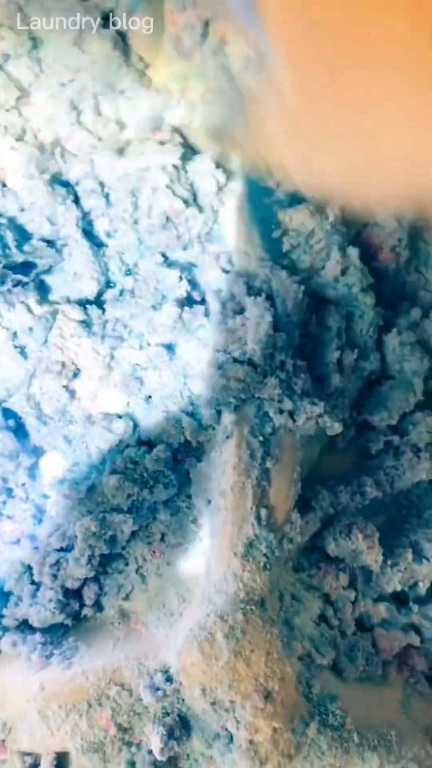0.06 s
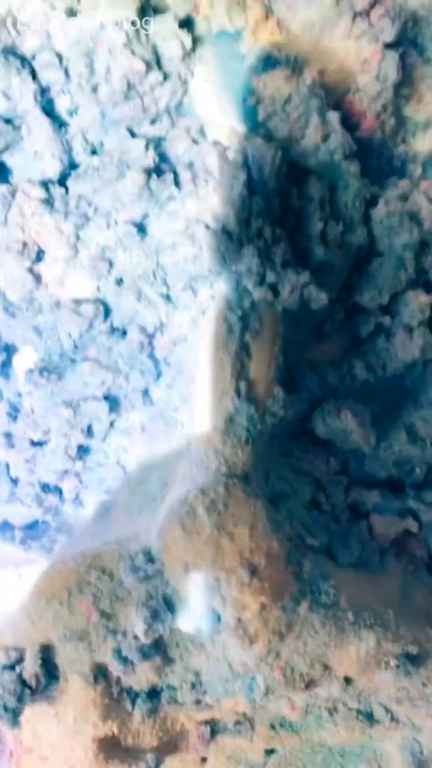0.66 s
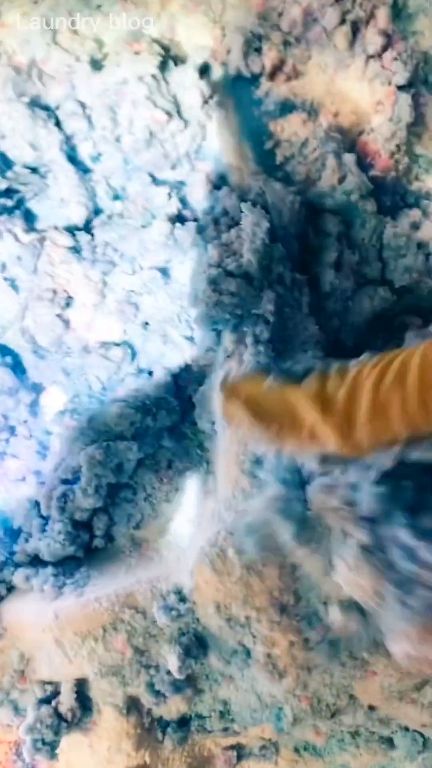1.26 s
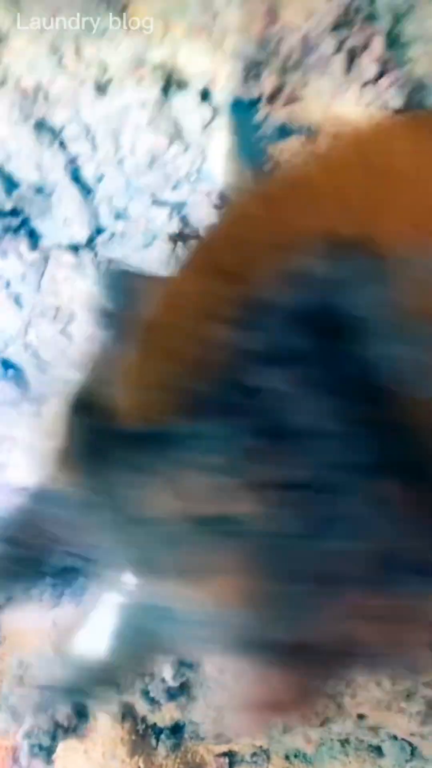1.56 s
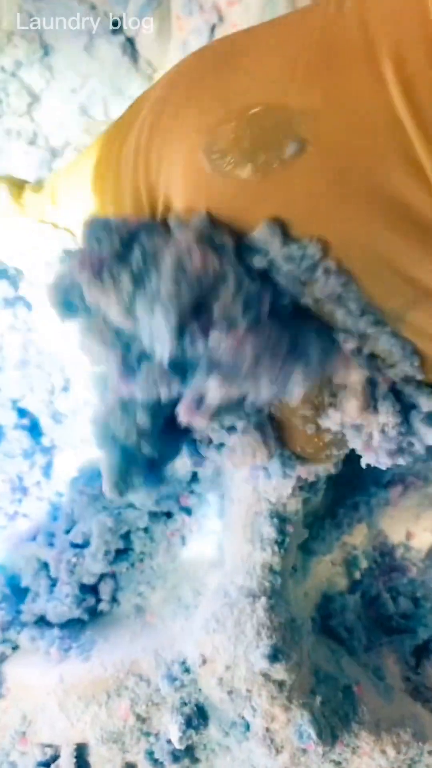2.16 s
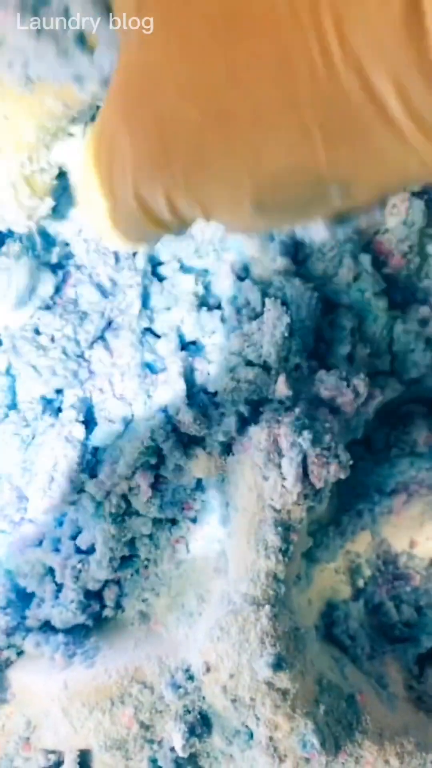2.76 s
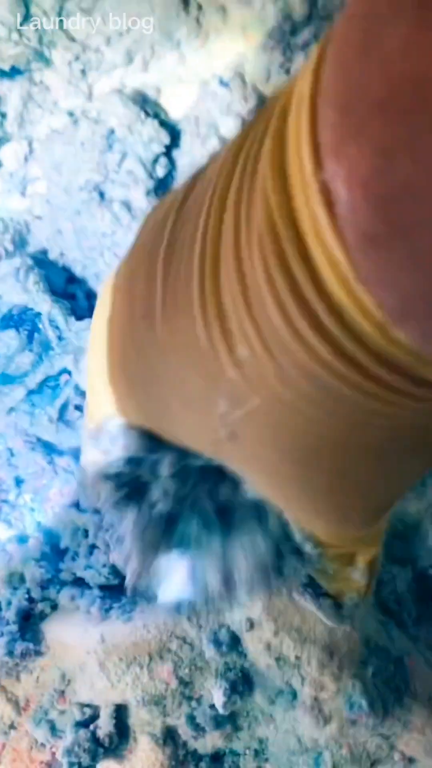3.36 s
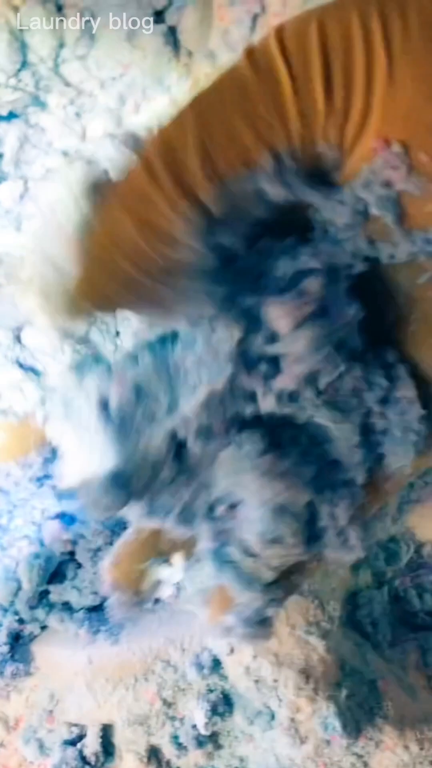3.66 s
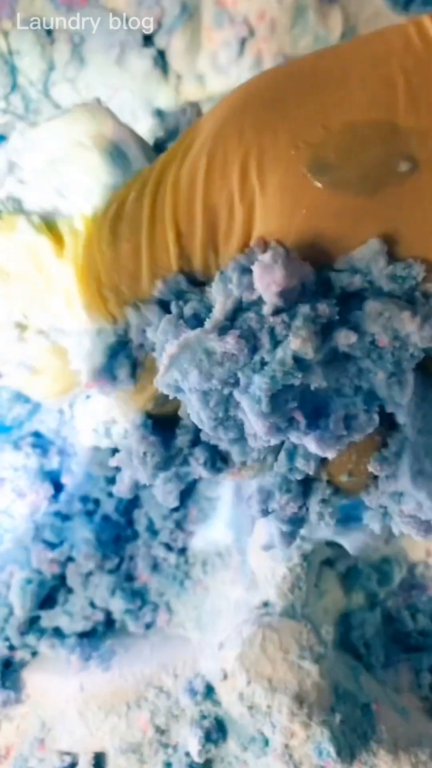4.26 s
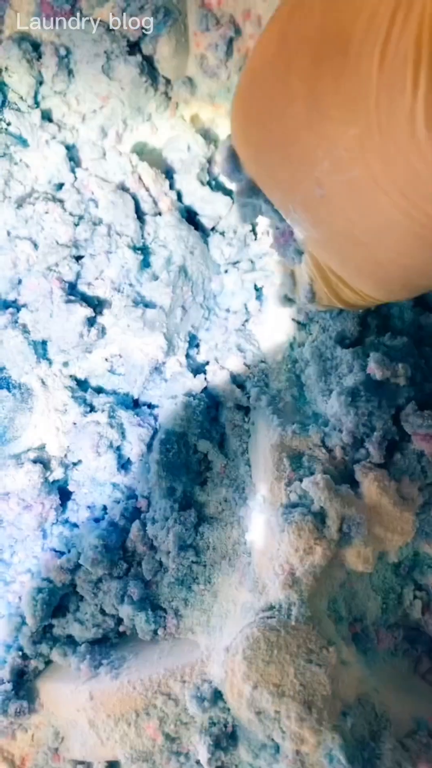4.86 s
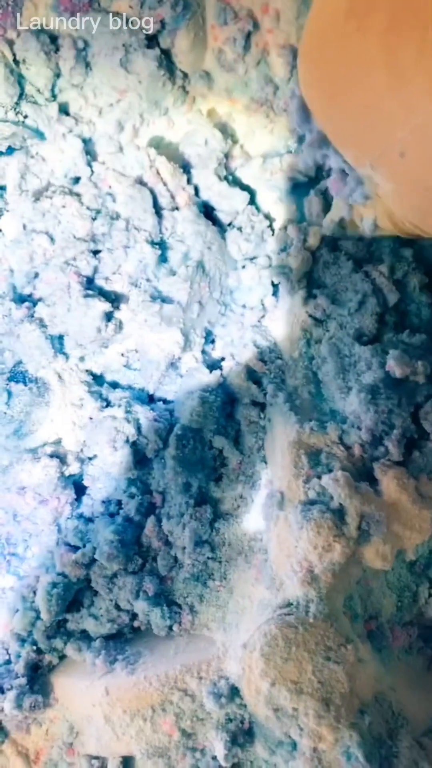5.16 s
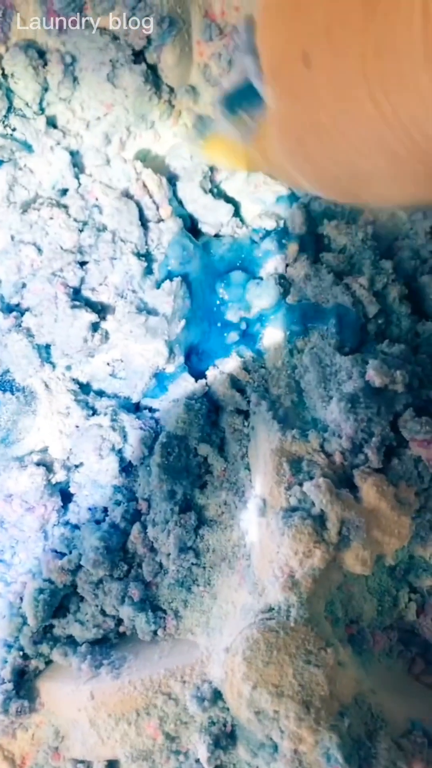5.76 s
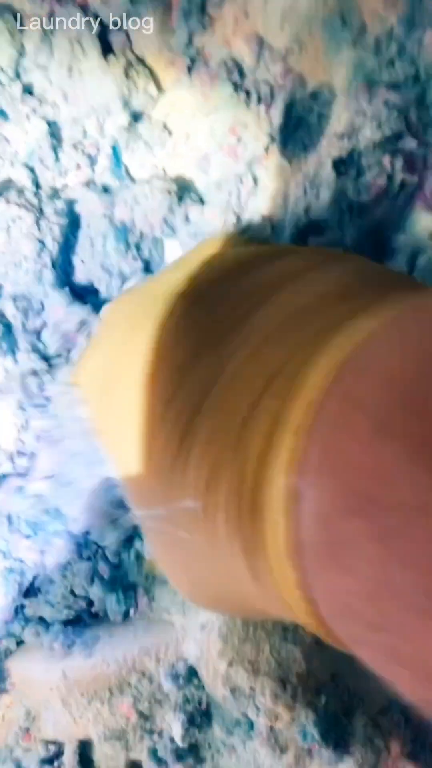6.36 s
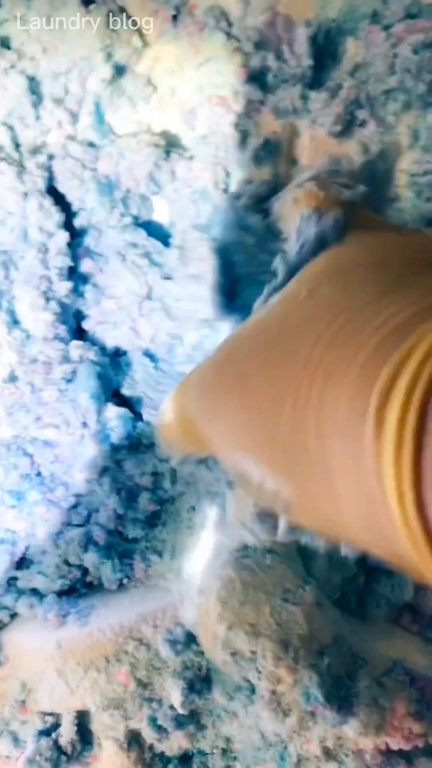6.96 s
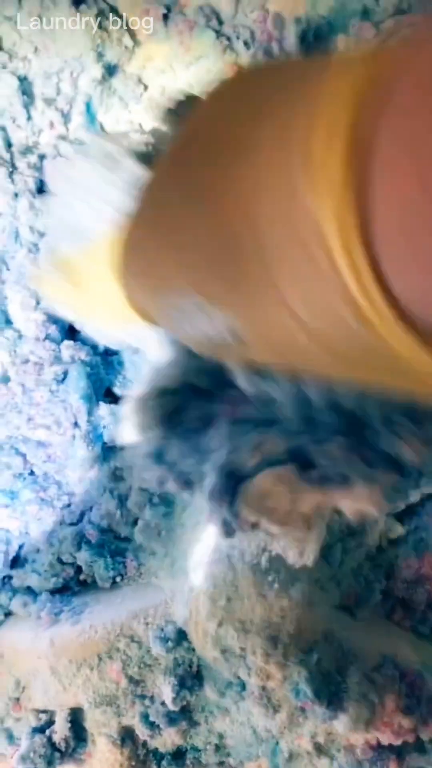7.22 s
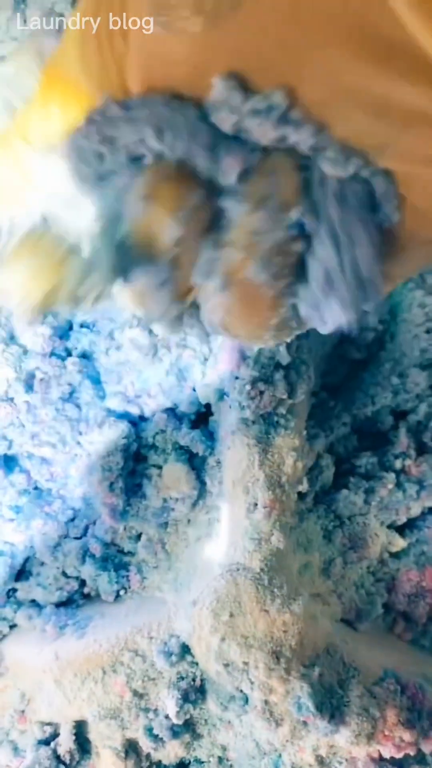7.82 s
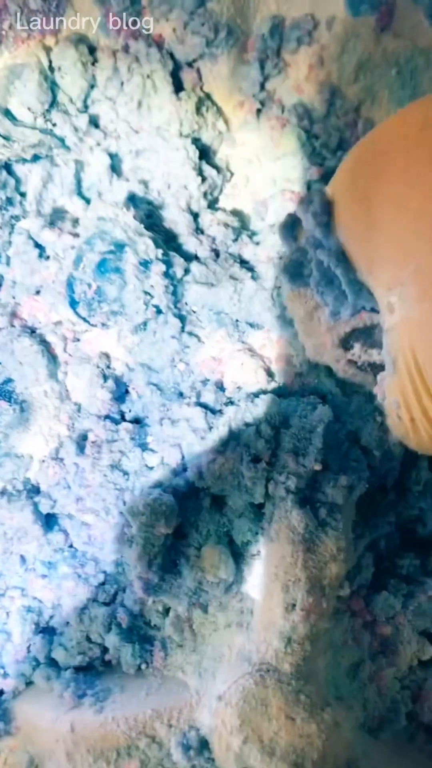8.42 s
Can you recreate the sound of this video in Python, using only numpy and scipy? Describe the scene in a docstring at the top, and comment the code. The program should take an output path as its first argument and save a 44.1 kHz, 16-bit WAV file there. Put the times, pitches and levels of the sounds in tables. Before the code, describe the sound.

A rubber-gloved hand digs into damp, clumpy powder and squeezes handfuls, making soft, gritty crunches with small snaps, dull thuds and faint rubbery creaks. Past midway a dollop of liquid lands with a loud plop and fizzes briefly. The crunching returns a little stronger, drops out for a moment, and a loud gush starts at the very end. It is all close to the microphone in a small, dry room.

```python
"""A close, damp crunch with snaps and soft thuds: a rubber-gloved hand digs, squeezes and crumbles powder.
Avalanches of tiny fractures make the crunch, clumps crack, lumps land, and the glove sticks and slips.
The tray beneath resonates faintly in a small, dry room. Past midway a dollop of liquid slaps down,
rings pockets of air and fizzes into the powder. The sound fades out briefly twice,
and a loud gush starts at the very end."""
import sys
import numpy as np
from scipy import signal
from scipy.fft import rfft, irfft, next_fast_len
from scipy.io import wavfile

SR = 44100
rng = np.random.default_rng(int(sys.argv[2]) if len(sys.argv) > 2 else 0)


def pcm_store(signal):
    """Save signal as 16-bit PCM."""
    levels = np.round(np.clip(np.atleast_2d(signal), -1, 1) * 32767)
    wavfile.write(sys.argv[1], SR, levels.astype(np.int16).T)


N = 378819
TIME = np.arange(N) / SR
FFT_SIZE = next_fast_len(N + SR // 2)
FREQ = np.maximum(np.arange(FFT_SIZE // 2 + 1) * SR / FFT_SIZE, 1)


def crunch(grit_gain, crumbs_gain, dust_gain):
    """Acoustic emission: fractures come in avalanches; crumbs sound low, grit in the middle, dust high."""
    # spectrum of the fracturing powder: frequency_hz, gain_db
    spectrum = [(400, -15), (600, -14), (900, -4), (1500, -0.5), (2400, 1.5), (3300, 2), (4600, -2.5),
                (7000, -11.5), (8300, -13), (10000, -23.5), (12500, -19), (15500, -19)]
    grip_db = 1.22 * walk(rate_hz=20)
    avalanche = undb(grip_db + walk(rate_hz=41) + 1.12 * walk(rate_hz=260))
    fine_grains = clicks(per_second=9000, spread_db=2.5) * avalanche
    large_granules = undb(-12) * clicks(per_second=70, spread_db=0.1)
    grains = tray(through(fine_grains + large_granules, colour(spectrum)))
    grains = room(grains, wet_db=-1.5, t60_s=0.21)
    crumbs = unit(band(grains, 450, 1885, order=5)) * crumbs_gain
    grit = unit(band(grains, 1885, 6590, order=5)) * grit_gain
    dust = unit(band(grains, 6140, 16600, order=5)) * dust_gain
    return crumbs + grit + dust


def handwork():
    """Incoherent sources add in power: the hand's strokes sum to five gains, from grit to rumble."""
    # fingers ploughing the bed, coarse and heavy:
    # start_s, hold_s, grit_db, attack_s, release_s, crumbs_re_grit_db, churn_re_grit_db
    digs = [(0.0, 0.042, -51, 0.026, 0.31, -2, -12.5), (0.253, 0.083, -49, 0.015, 0.05, 1, -3.5),
            (0.426, 0.097, -49.5, .04, 0.095, 2.5, -1.5), (0.658, 0.043, -49, 0.044, 0.055, -1, 0.5),
            (0.747, .13, -44.5, 0.025, 0.064, -2.5, -5), (0.941, 0.059, -45, 0.024, 0.13, -1, -11.5),
            (1.083, 0.16, -53, .05, .06, -4, -9.5), (1.32, 0.019, -45.5, 0.058, 0.046, -2.5, -16),
            (1.521, 0.011, -65, 0.016, .02, 2, 10.5), (3.103, .015, -47.5, 0.06, 0.035, -2, -12),
            (3.192, 0.3, -46, 0.048, 0.022, -4, -15.5), (6.095, 0.057, -52.5, 0.066, .05, -1, -5.5),
            (6.226, 0.13, -46, 0.05, 0.034, -5, -15), (6.407, 0.039, -41, 0.037, 0.12, -6.5, -16.5),
            (6.664, 0.038, -48.5, 0.019, 0.066, -1, -16.5), (6.794, 0.23, -45, 0.029, 0.041, -1.5, -11),
            (7.062, .14, -43, 0.028, 0.043, -5, -16.5), (8.067, 0.01, -44.5, 0.0042, 0.019, 3.5, -9.5)]
    # a handful kneaded above the bed, fine and light:
    # start_s, hold_s, grit_db, attack_s, release_s, crumbs_re_grit_db, dust_re_grit_db
    squeezes = [(1.423, 0.038, -61, 0.038, 0.041, -1, 0), (1.546, 0.018, -54, 0.017, 0.065, -8.5, -4.5),
                (1.698, 0.085, -62.5, 0.03, 0.15, 1.5, 2.5), (1.825, .53, -56, .04, 0.087, -8, -7),
                (2.058, .06, -54.5, 0.19, 0.19, -12, 2), (2.436, 0.1, -59.5, .03, 0.015, -11, -3.5),
                (2.628, .02, -44, 0.048, 0.11, -9.5, -4.5), (2.834, 0.061, -61.5, 0.11, 0.15, -2.5, 2.5),
                (2.967, .015, -50.5, 0.021, 0.12, -5, -4), (3.25, 0.24, -59, .1, .05, -6, 1.5),
                (3.555, 0.21, -54, .03, 0.048, -6.5, 2), (3.844, .47, -55, 0.046, 0.2, -8.5, -0.5),
                (4.506, 0.034, -51, 0.034, 0.098, -8, -2.5), (4.744, 0.057, -61.5, 0.044, 0.03, -3.5, 2.5),
                (4.987, 0.024, -69, .03, 0.081, 2, 3), (5.192, 0.22, -64.5, 0.1, .06, -16, 3),
                (5.79, .02, -64.5, 0.087, 0.044, -8, -3), (5.939, 0.024, -46.5, 0.039, 0.029, -11.5, -1),
                (6.02, 0.11, -64, 0.04, 0.094, 7, 5.5), (6.67, .035, -50.5, 0.02, 0.051, -3, 3),
                (7.347, 0.018, -51, 0.074, 0.043, -5, 3), (7.395, 0.052, -46.5, 0.029, 0.079, -3.5, -1.5),
                (7.598, 0.034, -46.5, 0.027, 0.018, -4.5, -3.5),
                (7.656, .005, -45, 0.023, 0.035, -8.5, 0.5), (7.816, 0.11, -53, 0.12, 0.28, -7, 0),
                (8.07, 0.057, -40, 0.013, 0.034, -8.5, -5.5),
                (8.213, 0.022, -45.5, 0.028, 0.041, -5.5, -2.5), (8.486, 0.037, -67.5, .03, .02, 1, 2)]
    # loose powder sliding back onto the heap: start_s, hold_s, churn_db, attack_s, release_s
    slides = [(.19, 0.097, -53.5, 0.037, 0.046), (1.2, .06, -60, .05, 0.22), (1.69, 0.11, -65.5, 0.039, .1),
              (2.83, 0.3, -61, 0.045, .12), (3.55, 0.023, -62, 0.022, 0.14),
              (4.54, 0.095, -60.5, 0.046, 0.14), (5, 0.025, -60.5, 0.057, 0.034),
              (5.327, 0.022, -71.5, .03, 0.054), (6.184, .01, -43.5, 0.011, 0.022),
              (6.827, 0.057, -40, 0.025, 0.0075), (7.73, 0.069, -65.5, 0.025, 0.12)]
    dig_dust_db, dig_rumble_db = -6.5, -25.5  # relative to the grit
    squeeze_churn_db, squeeze_rumble_db = -20.5, -20  # relative to the grit
    settling_db = [-73.5, -71.5, -75.5, -73, -68.5]  # grit, crumbs, dust, churn, rumble at rest
    power = np.outer(undb(settling_db) ** 2, np.ones(N))
    for *shape, crumbs_db, churn_db in digs:
        balance = undb([0, crumbs_db, dig_dust_db, churn_db, dig_rumble_db])
        power += np.outer(balance ** 2, stroke(*shape))
    for *shape, crumbs_db, dust_db in squeezes:
        balance = undb([0, crumbs_db, dust_db, squeeze_churn_db, squeeze_rumble_db])
        power += np.outer(balance ** 2, stroke(*shape))
    grit, crumbs, dust, churn, rumble = power
    slide_churn = sum(stroke(*row) for row in slides)
    slide_rumble = slide_churn * undb(-11.5) ** 2
    return np.sqrt([grit, crumbs, dust, churn + slide_churn, rumble + slide_rumble])


def stroke(start_s, hold_s, level_db, attack_s, release_s):
    """Power envelope of one movement: a Gaussian rise, a hold, then exponential relaxation."""
    early = np.maximum(start_s - TIME, 0)
    late = np.maximum(TIME - start_s - hold_s, 0)
    falloff = np.minimum((early / attack_s) ** 2 + late / release_s, 20)
    return (undb(level_db) * np.exp(-falloff)) ** 2


def snaps():
    """Brittle fracture: a clump starts to give, breaks with one crack, then sheds a dying spray."""
    # breaking clumps: time_s, level_db, centre_hz, crumble_s, crumbs_re_crack_db
    clumps = [(0.246, -41.5, 2310, 0.0098, 11.5), (0.506, -43.5, 1490, 0.0099, 16.5),
              (0.653, -47.5, 2040, 0.013, 13), (.733, -35.5, 1490, 0.011, 6), (0.883, -42, 1530, 0.013, 13),
              (2.394, -32, 3680, 0.02, 4.5), (3.606, -41, 4200, 0.004, 4.5),
              (4.186, -45.5, 2500, 0.0075, -2), (4.453, -42.5, 1460, .003, -2),
              (4.497, -51, 1200, .005, -1), (4.510, -47.5, 1700, 0.01, 10.5),
              (4.670, -37, 2930, 0.0049, -1), (5.149, -57.5, 6000, 0.016, 12), (5.262, -48, 7000, 0.01, 11),
              (5.652, -60, 2020, .02, -6), (5.858, -53, 6000, 0.028, 10), (6.184, -36.5, 2760, 0.0074, 3),
              (6.650, -33, 1870, 0.0033, -2.5), (7.089, -37.5, 2230, 0.011, 10),
              (8.065, -38, 3060, 0.016, 7), (8.126, -35.5, 2900, 0.011, 6.5)]
    # spectrum of a crack: frequency_hz, gain_db
    spectrum = [(300, -14.5), (900, -5.5), (2500, -3), (7500, -3), (10000, -9.5), (15500, -4)]
    out, spray = np.zeros(N + SR), clicks(per_second=6000, spread_db=2)
    count, lead = SR // 4, SR // 50
    t = (np.arange(count) - lead) / SR
    for time_s, level_db, centre_hz, crumble_s, crumbs_db in clumps:
        start = int(time_s * SR) - lead
        span = slice(start, start + count)
        force = spray[span] * np.exp(np.minimum(t / 0.0046, -t / crumble_s))
        force *= undb(crumbs_db) / np.linalg.norm(force)
        force[lead] += 1  # the crack itself
        sound = band(force, centre_hz / 2, centre_hz * 1.6, order=1)
        # the level is the crack's energy spread over 4.4 ms; the crumbs add their own
        gain = undb(level_db) * np.sqrt(0.0044 * SR) * np.hypot(1, undb(crumbs_db))
        out[span] += gain * sound / np.linalg.norm(sound)
    return tray(through(out[:N], colour(spectrum)))


def dollop():
    """Impact and bubble resonance: liquid slaps, spatters, rings trapped air and fizzes as it soaks in."""
    # the liquid striking and slopping back: start_s, peak_db, pitch_hz, swell_s
    slops = [(5.4624, -12.5, 1164, 0.0012), (5.4645, -18, 345, 0.0014), (5.466, -27.5, 590, .0015),
             (5.4865, -22.5, 1185, 0.0013)]
    # spectrum of the spatter: frequency_hz, gain_db
    spectrum = [(20, -65), (60, -45), (150, -21), (320, -15), (650, -11), (900, -2.5), (1230, -4),
                (1900, 5.5), (3000, -9.5), (4500, -8.5), (5200, -15), (7300, -9), (9000, -17.5),
                (15500, -24.5)]
    # air pockets under the liquid: pitch_hz, relative_db, t60_s
    pockets = [(248, -2, .11), (1042, 0, .09), (1140, -5, .08), (1247, 3.5, .13), (1370, -2, .11),
               (1513, 1, .11), (1700, -4, .09), (1774, 0, .11), (1981, 0, .12), (2098, -4, .11)]
    # bubbling before the strike and during the soak: time_s, level_db, pitch_hz
    bubbling = [(5.41, -84, 1696), (5.435, -57, 1652), (5.452, -33.5, 1726), (5.465, -28.5, 1881),
                (5.5, -43.5, 1800), (5.525, -62, 2100), (5.635, -59.5, 2095), (5.66, -51, 1913),
                (5.75, -62.5, 1630), (5.87, -61.5, 1496)]
    age = np.maximum(TIME - slops[0][0], 0)
    splash = undb(-32 - 60 * age / 0.035)
    droplets = undb(-22.5 - 60 * age / 0.12)
    patter = unit(through(clicks(per_second=9000, spread_db=1), colour(spectrum)))
    spatter = patter * (splash + droplets) * (age > 0)
    ring = sum(undb(db - 60 * age / t60_s) * np.sin(2 * np.pi * hz * age) for hz, db, t60_s in pockets)
    fizz_db, pitch_hz = curves(bubbling)
    # bubbles of scattered sizes sound around one drifting pitch
    scatter = band(rng.standard_normal(N), 14, 440, order=2)
    bubbles = unit(scatter * np.cos(2 * np.pi * np.cumsum(pitch_hz) / SR))
    fizz = bubbles * undb(fizz_db) * (TIME > bubbling[0][0]) * (TIME < bubbling[-1][0])
    return blows(slops) + spatter + undb(-29) * ring + fizz


def gush():
    """Dense impulses excite broad resonances: a bright spray first, its hollow body just after."""
    # onset of the gush: time_s, spray_db, body_db
    onset = [(8.53, -70, -74), (8.548, -36.5, -46), (8.559, -26, -39), (8.565, -23.5, -23),
             (8.59, -20, -22.5)]
    # its resonances: centre_hz, width_hz, gain_db
    modes = [(78, 22, -3.5), (179, 180, -9), (312, 60, 2), (735, 45, -5), (1030, 120, 7), (1760, 540, -5),
             (2880, 250, -3.5), (3750, 270, 2.5), (4400, 220, 5), (6560, 600, -36), (12000, 7000, -42)]
    spray_db, body_db = curves(onset)
    rush = through(clicks(per_second=15000, spread_db=2), resonances(modes))
    spray = unit(band(rush, 2100, 16300, order=3)) * undb(spray_db)
    body = unit(band(rush, 30, 2500, order=3)) * undb(body_db)
    return (spray + body) * (TIME > onset[0][0])


def thuds():
    """Inelastic impact: lumps land and fingers bump the bed."""
    # blows on the powder: start_s, peak_db, pitch_hz, swell_s
    impacts = [(.227, -46.5, 93, 0.0029), (.482, -40, 88, 0.0041), (.496, -36, 723, 0.0062),
               (.729, -30, 251, 0.0023), (.735, -36, 1030, 0.0057), (.854, -40, 67, 0.012),
               (.886, -35, 416, 0.0075), (.888, -34, 762, 0.0062), (1.52, -48, 804, .008),
               (2.36, -54, 71, 0.0081), (2.564, -54, 99, .006), (2.835, -49, 76, 0.0079),
               (2.9, -50, 75, 0.011), (3.548, -47.5, 131, 0.0034), (4.172, -49, 61, 0.0055),
               (4.452, -45.5, 747, .004), (6.181, -31, 253, .0055), (6.631, -52, 77, .0055),
               (6.837, -29.5, 313, 0.0079), (6.847, -28, 400, 0.0051), (6.85, -46, 81, 0.016),
               (6.861, -25.5, 249, 0.0051)]
    return blows(impacts)


def blows(impacts):
    """Damped oscillation: each soft blow is a few uneven cycles that swell and die in the powder."""
    out, t = np.zeros(N + SR), TIME[:SR // 5]
    wobble = np.pad(walk(rate_hz=140), (0, SR))
    for start_s, peak_db, pitch_hz, swell_s in impacts:
        start, age = int(start_s * SR), t / swell_s
        span = slice(start, start + len(t))
        phase = 2 * np.pi * pitch_hz * np.cumsum(1 + 0.05 * wobble[span]) / SR
        envelope = (age * np.exp(1 - age)) ** 0.7
        out[span] += undb(peak_db) * envelope * np.sin(phase)
    return out[:N]


def rubs():
    """Stick-slip friction: rubber drags on the grains, each stretch of glove ringing at its own pitch."""
    # creaks of the glove: peak_s, swell_s, level_db, pitch_hz, width_hz
    creaks = [(.985, .08, -47, 2500, 900), (2.394, 0.0028, -29, 3790, 1090),
              (2.406, 0.0075, -39, 3700, 1075), (2.86, .02, -53.5, 6500, 1800),
              (3.27, 0.097, -47.5, 1560, 700), (3.41, 0.045, -43.5, 2000, 1300),
              (4.17, 0.21, -58, 1930, 220), (4.44, .012, -47.5, 1650, 450), (4.456, .0027, -34, 1710, 497),
              (4.454, 0.0071, -41, 2840, 500), (4.512, 0.015, -43.5, 3400, 800),
              (6.415, 0.028, -40.5, 2680, 1400), (6.85, .018, -38.5, 1430, 600),
              (7.10, 0.036, -41, 2070, 900), (7.665, 0.042, -44, 2710, 700), (8.132, 0.014, -35, 2750, 900)]
    out, slips = np.zeros(N), clicks(per_second=6200, spread_db=4)
    for peak_s, swell_s, level_db, pitch_hz, width_hz in creaks:
        start = max(int(peak_s * SR) - SR // 2, 0)
        span = slice(start, start + SR)
        ring = unit(band(slips[span], pitch_hz - width_hz / 2, pitch_hz + width_hz / 2, order=2))
        envelope = np.exp(-((TIME[span] - peak_s) / swell_s) ** 2)
        out[span] += undb(level_db) * envelope * ring
    return out


def heap(churn_gain, rumble_gain):
    """Granular flow: powder shifts in dull jerks under the palm and shakes the tray."""
    # spectra of the shifting heap and the shaken tray: frequency_hz, gain_db
    churn_spectrum = [(60, -15), (130, -4.5), (220, 2), (360, 0), (500, -6.5), (700, -9.5), (1200, -42)]
    rumble_spectrum = [(12, -21.5), (30, -9.5), (55, -8), (75, 3), (110, -13.5), (160, -7), (300, -35)]
    churn = unit(through(clicks(per_second=900, spread_db=-2.5), colour(churn_spectrum)))
    jerks = clicks(per_second=270, spread_db=-1.5) * undb(2.5 * walk(rate_hz=25))
    rumble = unit(through(jerks, colour(rumble_spectrum)))
    return churn * churn_gain + rumble * rumble_gain


def tray(x):
    """Forced vibration: the tray adds a ring to the direct sound, varying with the hand's contact."""
    # resonances of the tray: centre_hz, width_hz, gain_db
    modes = [(743.7, 21.5, 12.5), (1024, 47, 5), (1252, 20, 0.5), (1470, 60, -13.5), (1780, 55, -26.5),
             (1940, 45, -15.5), (2310, 140, -23.5)]
    contact = undb(2.75 * walk(rate_hz=9) + 3.5)
    return x + through(x, resonances(modes)) * contact


def room(x, wet_db, t60_s):
    """Reverberation: dense reflections from table and walls, their pattern shifting as the hand moves."""
    decay = undb(-60 * TIME / t60_s) * (TIME > .002)
    place = 2 * np.pi * TIME + 0.87 * walk(rate_hz=5)
    wet = 0
    for share in np.cos(place), np.sin(place):
        tail = band(clicks(per_second=5000, spread_db=3), 1300, 21000, order=2) * decay
        wet = wet + share * through(x, rfft(tail, FFT_SIZE) / np.linalg.norm(tail))
    return (x + undb(wet_db) * wet) / np.hypot(1, undb(wet_db))


def clicks(per_second, spread_db):
    """Shot noise of rms 1: a positive spread makes a few clicks large, a negative one a few small."""
    size = undb(spread_db * np.minimum(rng.exponential(size=N), 6))
    occurs = rng.random(N) < per_second / SR
    return unit(occurs * size * rng.choice([-1, 1], N))


def walk(rate_hz):
    """Random modulation: interpolated Gaussian values with a spread near 1."""
    points = rng.standard_normal(N // 20)
    return np.interp(TIME * rate_hz, np.arange(len(points)), points) * np.sqrt(3 / 2)


def resonances(modes):
    """Modal superposition: the summed response of second-order resonators."""
    return sum(undb(db) / (1 + 1j * (FREQ / hz - hz / FREQ) * hz / width_hz) for hz, width_hz, db in modes)


def colour(spectrum):
    """Minimum-phase response through (frequency_hz, gain_db) points, by the folded cepstrum."""
    hz, db = np.transpose(spectrum)
    magnitude = undb(np.interp(np.log(FREQ), np.log(hz), db))
    cepstrum = irfft(np.log(magnitude), FFT_SIZE)
    cepstrum[1:FFT_SIZE // 2] *= 2
    cepstrum[FFT_SIZE // 2 + 1:] = 0
    return np.exp(rfft(cepstrum))


def through(x, response):
    """Convolution, as a product of spectra."""
    return irfft(rfft(x, FFT_SIZE) * response, FFT_SIZE)[:N]


def band(x, lo_hz, hi_hz, order):
    """Maximally flat band-pass filter."""
    edges_hz = [lo_hz, min(hi_hz, SR / 2 - 1000)]
    return signal.sosfilt(signal.butter(order, edges_hz, "band", fs=SR, output="sos"), x)


def curves(table):
    """Linear interpolation of timed rows, one value a sample."""
    time_s, *columns = np.transpose(table)
    return [np.interp(TIME, time_s, column) for column in columns]


def undb(db):
    """Decibels to amplitude ratio."""
    return 10 ** (np.asarray(db) / 20)


def unit(x):
    """Normalisation to rms 1."""
    return x / np.sqrt(np.mean(x ** 2))


def scene():
    """Superposition: all sources add at one microphone, the same in both ears."""
    grit, crumbs, dust, churn, rumble = handwork()
    mono = crunch(grit, crumbs, dust)
    mono += room(snaps(), wet_db=0, t60_s=0.072)
    mono += room(rubs(), wet_db=-10, t60_s=0.052)
    mono += heap(churn, rumble) + thuds() + dollop() + gush()
    return np.array([mono, mono])


def record(dry):
    """Saturation rounds the peaks; two brief fades to silence and a steep low-pass follow."""
    # fades of the whole sound: fade_start_s, silent_s, return_s, full_s
    pauses = [(4.828, 4.867, 4.945, 5.0), (8.275, 8.34, 8.452, 8.505)]
    overload, cutoff_hz = .6, 15650
    rounded = overload * np.tanh(dry / overload)
    fade = np.prod([np.interp(TIME, pause, [1, 0, 0, 1]) ** 2 for pause in pauses], axis=0)
    low_pass = signal.ellip(10, .2, 70, cutoff_hz, fs=SR, output="sos")
    return signal.sosfilt(low_pass, rounded * fade)


dry = scene()
out = record(dry)
pcm_store(out)
```